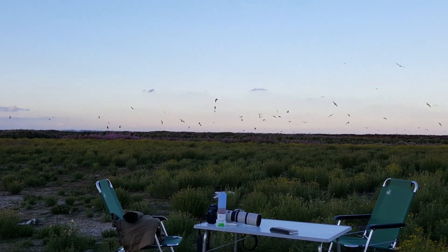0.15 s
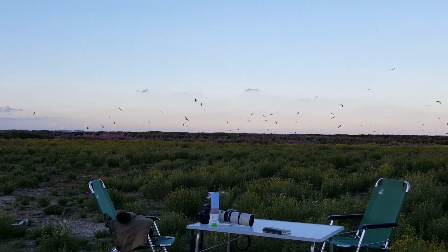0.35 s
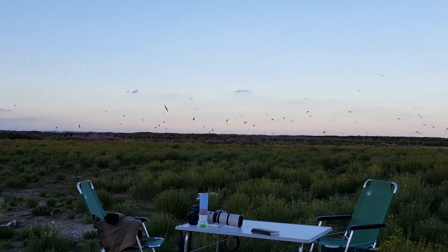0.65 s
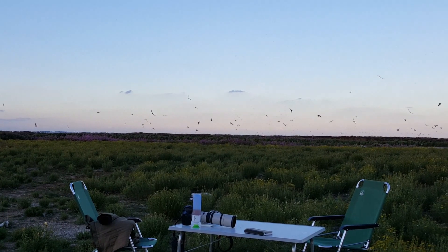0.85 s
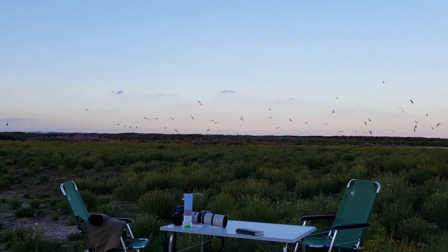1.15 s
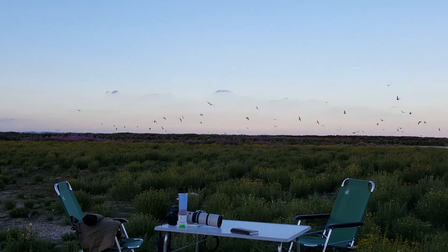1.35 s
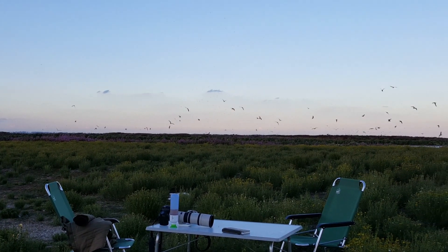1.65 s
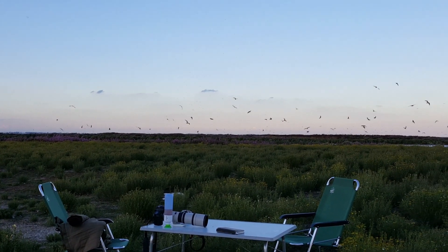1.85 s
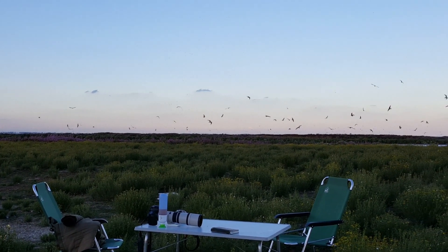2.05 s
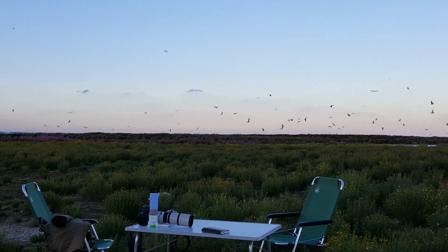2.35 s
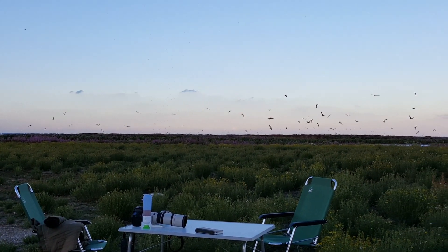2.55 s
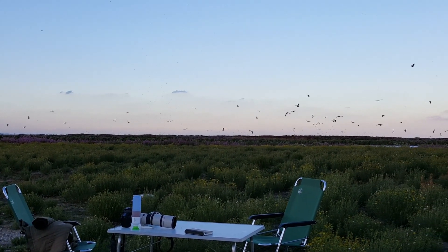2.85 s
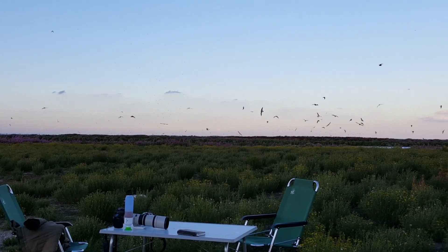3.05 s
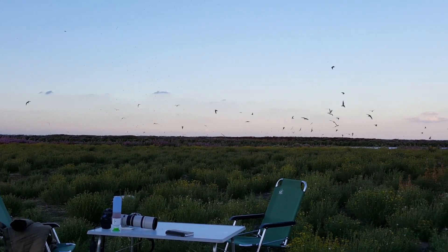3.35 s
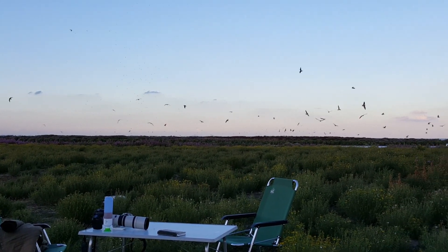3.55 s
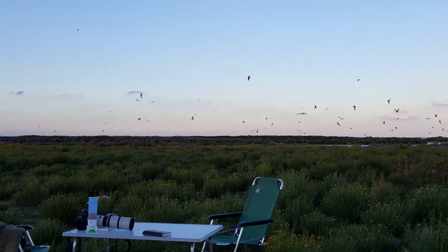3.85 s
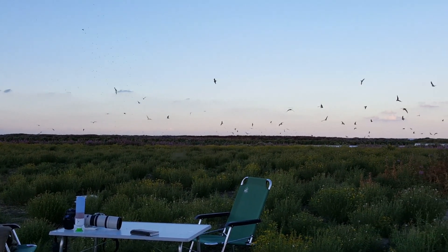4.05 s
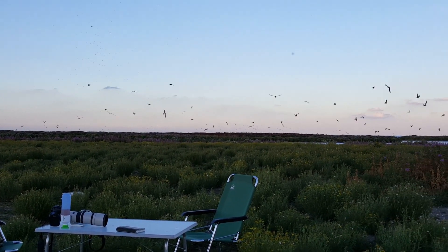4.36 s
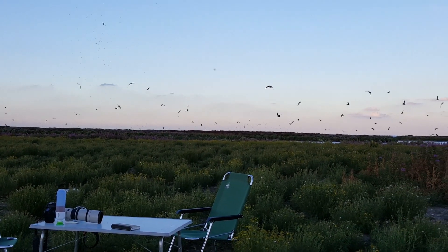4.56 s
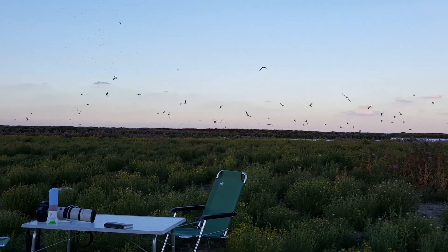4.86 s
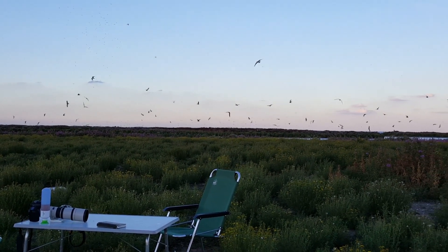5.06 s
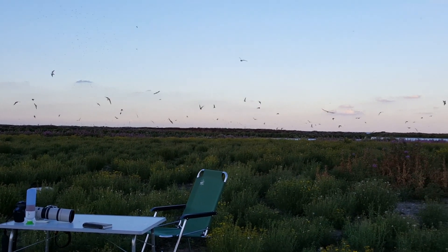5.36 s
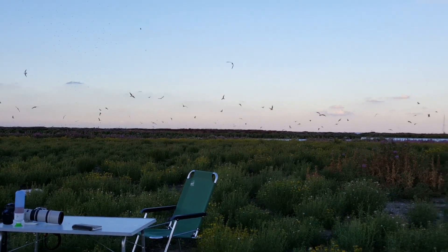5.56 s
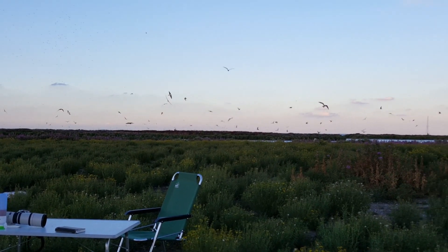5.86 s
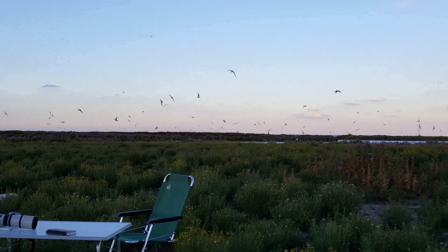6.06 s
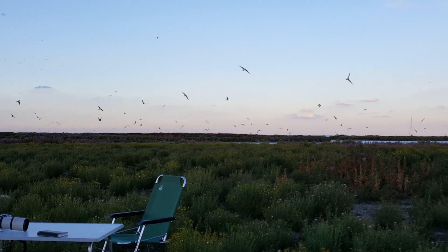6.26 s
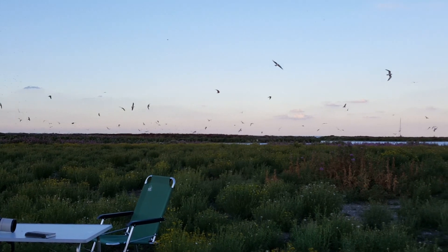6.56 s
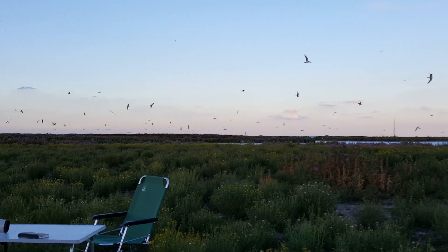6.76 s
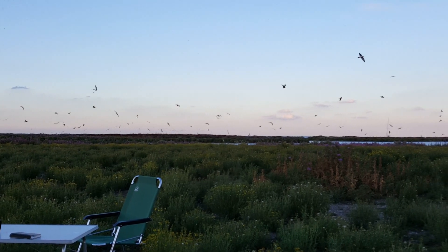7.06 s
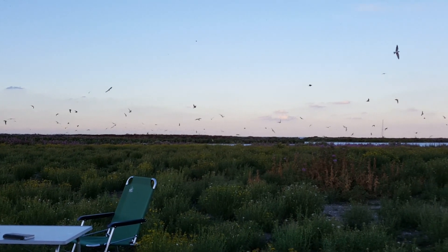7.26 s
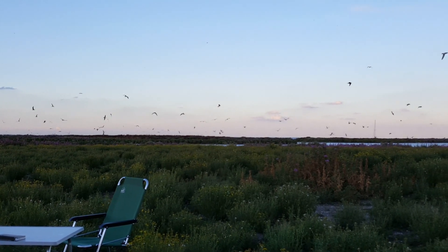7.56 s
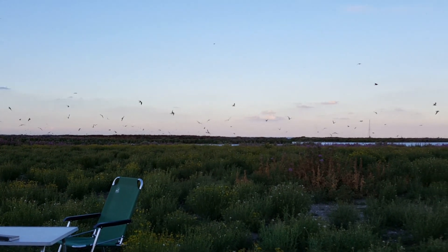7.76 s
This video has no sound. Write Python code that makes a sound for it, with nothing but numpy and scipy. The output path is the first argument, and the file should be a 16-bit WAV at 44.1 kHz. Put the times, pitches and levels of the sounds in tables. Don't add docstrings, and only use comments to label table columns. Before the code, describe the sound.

Hoarse, trilled seabird cries and dry rasps over a blurred distant chorus, with low wind buffeting, small bird chips and a brief insect buzz.

```python
import sys
import numpy as np
from scipy import signal
from scipy.fft import rfft, irfft, next_fast_len
from scipy.io import wavfile
from scipy.ndimage import uniform_filter1d

SR = 44100
rng = np.random.default_rng(int(sys.argv[2]) if len(sys.argv) > 2 else 0)


def volts(x):
    e = np.asarray(x, float) / 20
    return 10 ** e


def wrap_up_sound(samples):
    columns = np.atleast_2d(samples).T
    tamed = np.clip(columns, -1, 1)
    steps = np.round(tamed * 32767).astype(np.int16)
    wavfile.write(sys.argv[1], SR, steps)


N = 348390
PAD = 32


def near_calls(out):
    # t/s, pitch f/Hz, 2nd harmonic level/dB
    contours = [
        [(0.8, 1599, -40), (0.85, 1687, -40), (0.95, 1634, -44), (1.02, 1626, -40), (1.065, 1520, -39.5)],
        [(1.025, 1900, -41), (1.09, 1757, -49), (1.3, 1745, -48), (1.4, 1697, -45.5), (1.47, 1500, -44.5)],
        [(1.49, 1612, -44), (1.53, 1700, -45), (1.59, 1732, -47), (1.69, 1630, -45.5), (1.73, 1473, -44.5),
         (1.81, 1443, -50.5)],
        [(2.465, 1593, -33.5), (2.55, 1552, -40.5), (2.65, 1569, -41), (2.75, 1521, -37.5), (2.85, 1567, -42.5),
         (2.93, 1490, -49)],
        [(4.285, 1600, -41.5), (4.33, 1588, -42.5), (4.5, 1549, -39), (4.6, 1538, -42), (4.7, 1505, -38)],
        [(4.6, 1272, -68), (4.79, 971, -49.5)],
    ]
    # left lag/samples, left minus right/dB, harmonics 1, 3, 4 against the 2nd/dB
    birds = [(-10.5, -1.5, -7.5, -11, -22.5), (6, -3.5, -9, -19, -37), (15, -3.5, -8.5, -7.5, -18),
             (-7, 4, -21, -14, -23.5), (-1.5, 6, -15, -15, -20), (-4, 1, -3.5, 0, 1)]
    roughness = [.9, 1.3, 1.1, .7, .3, 1.5]
    for contour, bird, rough in zip(contours, birds, roughness):
        start_s = contour[0][0]
        hz, db = curves(contour)[1]
        sing(out, start_s, hz, db, *bird, rough)


def cries(out):
    # t/s, length/s, first f/Hz, end f/Hz, level/dB
    events = [(0.0, .15, 1623, 1501, -47), (.08, .06, 1130, 1100, -55), (.191, .17, 1650, 1600, -53),
              (.61, .13, 1750, 1780, -63), (.86, .22, 1560, 1520, -58), (1.07, .05, 1185, 1140, -51),
              (1.18, .13, 1560, 1480, -52), (2.111, .2, 1600, 1430, -52), (2.488, .19, 1687, 1615, -53.5),
              (3.335, .09, 1400, 1370, -54), (3.97, .2, 1800, 1700, -58), (4.044, .12, 1500, 1463, -50),
              (4.289, .35, 1670, 1584, -60), (5.23, .15, 1510, 1475, -60), (6.25, .17, 1360, 1330, -58),
              (6.95, .12, 1380, 1340, -56), (7.075, .22, 1900, 1750, -69), (7.141, .1, 1550, 1456, -63)]
    # left lag/samples, left minus right/dB, 3rd harmonic against the 2nd/dB
    birds = [(13.5, 0, -5.5), (17, -4, -17), (-12, 1.5, -6), (13.5, -0.5, 2), (5.5, -8, -3), (5.5, -5, -13),
             (3, -6, -4), (14.5, 0, -10), (-10.5, 1, 3), (14, -1, -17), (15.5, 3, -11), (14.5, -1, -6),
             (-9, -3, 5.5), (-8.5, -3, 2), (11.5, 3, -12), (11.5, 0, -12), (17, -11, 5), (9, -5.5, 7)]
    for (s, length, top_hz, end_hz, db), (lag, pan_db, third_db) in zip(events, birds):
        hz = np.linspace(top_hz, end_hz, int(length * SR))
        sing(out, s, hz, db, lag, pan_db, -6, third_db, -14 + .6 * third_db, rough=.9)


def arches(out):
    # t/s, length/s, top f/Hz, end f/Hz, level/dB
    events = [(0.129, 0.06, 1780, 1470, -54.5), (0.601, 0.074, 1678, 1743, -47.5),
              (1.287, 0.078, 1770, 1390, -48.5), (3.293, 0.037, 1687, 1670, -44),
              (3.485, 0.028, 1535, 1430, -65.5), (3.564, 0.21, 1554, 1467, -54),
              (4.13, 0.023, 1660, 1640, -58), (5.535, 0.28, 1657, 1604, -61.5),
              (5.878, 0.042, 1920, 1580, -57), (6.327, 0.14, 1723, 1695, -56),
              (6.698, 0.18, 1674, 1600, -59), (6.888, 0.083, 1580, 1310, -56.5),
              (7.59, 0.033, 1520, 1420, -68), (7.249, 0.063, 1740, 1580, -53.5),
              (7.465, 0.037, 1627, 1550, -63), (7.793, 0.035, 1900, 1650, -58),
              (7.791, 0.034, 1540, 1520, -58), (7.879, 0.028, 1480, 1480, -58.5),
              (3.367, 0.05, 1672, 1560, -70), (4.244, 0.046, 1590, 1460, -55),
              (5.944, 0.076, 1570, 1500, -52), (3.853, 0.035, 1554, 1320, -47.5),
              (0.769, .03, 1583, 1500, -51), (1.212, 0.047, 1640, 1500, -55),
              (1.781, 0.043, 1610, 1500, -53), (2.005, 0.033, 1620, 1450, -60),
              (2.958, 0.034, 1740, 1500, -51), (3.892, 0.034, 1630, 1480, -60),
              (4.195, 0.033, 1680, 1550, -79), (5.408, 0.045, 1560, 1330, -56),
              (7.418, .032, 1530, 1380, -66), (7.755, 0.04, 1500, 1290, -58),
              (6.54, 0.041, 1510, 1480, -63), (7.693, 0.037, 1730, 1680, -53),
              (5.328, 0.037, 1600, 1310, -60), (5.99, 0.027, 1900, 1650, -67),
              (6.134, 0.053, 1530, 1280, -63), (7.299, 0.038, 1680, 1620, -59.5)]
    # left lag/samples, left minus right/dB, 3rd harmonic against the 2nd/dB
    birds = [(15, -4, 0), (16.5, 1, -8.5), (6.5, -7, -4), (-8, -1, -12), (-9, -20, 7), (-12.5, -2, -2),
             (-13, -25, -9), (-17, -0.5, 4.5), (-9, -3, -5.5), (6, 4, -4.5), (-7, -0.5, 6), (-7.5, 1, 5.5),
             (15, -7, 3), (-16.5, -2, -5), (11, -12, 5.5), (-17, -13, -3.5), (-9, -5, 2), (7, 3, 11),
             (7, -4, 4), (-9, -17, -11), (10.5, 1, -8), (-11, -4, -7), (6.5, -5, 2), (11, -6, -4),
             (11, 3, -1), (11, 3, 0), (15, 0, -8), (23, 3, -17), (14, 0, -2), (14, -2, -10), (13, 1, 5),
             (11, -2, 0), (6, -4, 5.5), (16.5, 0, -9), (-6.5, -2, 6), (-9, -5, 1), (11, 2, 4),
             (11, -2, 4.5)]
    top_at = 0.378
    for (s, length, top_hz, end_hz, db), (lag, pan_db, third_db) in zip(events, birds):
        along = np.linspace(0, 1, int(length * SR))
        bend = np.interp(along, [0, top_at, 1], [1, 0, 1]) ** 2
        foot_hz = np.where(along < top_at, top_hz * (1 - .09), end_hz)
        hz = top_hz + (foot_hz - top_hz) * bend
        db = db - 2.5 * bend
        sing(out, s, hz, db, lag, pan_db, -6, third_db, -14 + .6 * third_db, rough=.35 + 2 * length)


def sing(out, s, hz, db, lag, pan_db, first_db, third_db, fourth_db, rough):
    # t/s, trill rate f/Hz, first pulse after/s, depth 0-1, harmonics 5-8
    # level/dB
    trill_rows = [(.8, 58.8, 0.0031, 0.2, -42.5), (1.025, 55, 0.0075, 0.8, -41),
                  (1.49, 57.4, 0.01, 0.45, -38), (2.465, 57.7, 0.0141, 0.6, -36),
                  (2.485, 58.2, 0.0026, 0.6, -23), (4.285, 57.5, 0.0054, 1, -36),
                  (4.29, 57.8, 0.011, 1, -27), (5.23, 57, 0.016, 0.6, -34), (2.11, 33, 0.015, 0.6, -36),
                  (4.045, 38, 0.013, 1, -44), (5.534, 55, 0.0041, 0.74, -42), (7.075, 41, 0.0037, 0.6, -39),
                  (3.562, 45, 0.004, 0.56, -34), (.86, 43, 0.0146, 1, -44)]
    trills = {row[0]: row[1:] for row in trill_rows}
    nearest = min(trills, key=lambda at: abs(at - s))
    gentle = (56, 0, .3, -42)
    *shape, top_db = trills[nearest] if abs(nearest - s) < .0045 else gentle
    rate, first_s, depth = shape
    tiring = np.linspace(2, -5, len(hz))
    uppers = [top + tiring for top in (top_db, top_db, top_db - 1, top_db + 2)]
    stack = [first_db, 0, third_db, fourth_db] + uppers
    cycle = (rate * (np.arange(len(hz)) / SR - first_s) + .5) % 1 - .5
    hz = hz * (1 - 2 * .012 * min(depth, 1) * cycle)
    tone = voice(hz, stack, wobble=.0065 * rough, flutter_db=1.8, hoarse=.45 * rough)
    breath = level(ring(rng.standard_normal(len(hz)), 5400, 5400), top_db + 12.5)
    sound = (tone + breath) * volts(db) * fade(len(hz), .008)
    add(out, sound * trill(len(hz), *shape), int(s * SR), lag, pan_db)


def voice(hz, harmonics_db, wobble, flutter_db, hoarse):
    size = len(hz)
    unsteady = wobble * (walk(120.9, size) + walk(700, size))
    phase = 2 * np.pi * np.cumsum(hz * (1 + unsteady)) / SR
    stack = 0
    for number, db in enumerate(harmonics_db, 1):
        stack = stack + volts(db + flutter_db * walk(61.4, size)) * np.sin(number * phase)
    return np.sqrt(2) * stack * (1 + hoarse * walk(1500, size))


def trill(size, rate, first_s, depth):
    phase = 2 * np.pi * rate * (np.arange(size) / SR - first_s)
    depth = np.clip(depth, 0, 1)
    shut = .5 - .5 * np.tanh(5.5 * (np.cos(phase) + 0.22))
    return level(1 - depth * shut)


def rasps(out):
    # t/s, level/dB
    swells = [
        [(1.46, -40.5), (1.61, -40.5), (1.62, -34)],
        [(2.93, -41.5), (3.1, -37), (3.28, -34.5), (3.335, -44)],
        [(4.7, -42.5), (4.86, -41.5), (5.06, -40), (5.1, -44.5), (5.262, -46), (5.285, -58)],
    ]
    rattles = [(242, 66, 0.03, 8.5, -1.5, -29), (223, 50, 0.3, -6.5, 2.5, -18),
               (222.6, 56, 0.98, -2, 4.5, -24)]
    starts = [(0.0037, 3040), (.006, 3120), (.002, 3126)]
    for swell, (rate, trill_rate, depth, lag, pan_db, treble_db), first in zip(swells, rattles, starts):
        start, (db,) = curves(swell)
        sound = rattle(len(db), rate, trill_rate, depth, treble_db, *first)
        add(out, sound * volts(db) * fade(len(db), 0.0057), start, lag, pan_db)


def far_rasps(out):
    # t/s, length/s, throat f/Hz, trill rate f/Hz, level/dB
    events = [
        (0.857, 0.16, 2730, 58.3, -62),
        (1.7, 0.13, 2500, 56.7, -49),
        (1.93, 0.15, 2580, 56.1, -54),
        (2.297, 0.13, 2730, 55.1, -50),
        (3.501, 0.36, 2560, 55.9, -51.5),
        (5.438, 0.38, 2550, 55.7, -65),
        (5.9, 0.24, 2620, 55.3, -62),
        (6.922, 0.23, 2720, 56.3, -56),
        (7.499, 0.22, 2700, 45.5, -56),
        (7.809, 0.1, 2560, 46.2, -60),
    ]
    lags = [8, 10, -8, 12, 13, 12, 7, 8, 15, 15]
    for (s, length, hz, trill_rate, db), lag in zip(events, lags):
        size = int(length * SR)
        sound = rattle(size, 4.4 * trill_rate, trill_rate, .8, -29, 0, hz)
        add(out, sound * volts(db + 2 * walk(17, size)) * fade(size, 0.014), int(s * SR), lag, -1.5)


def rattle(size, rate, trill_rate, depth, treble_db, first_s, throat_hz):
    # f/Hz, width f/Hz, level/dB
    throat = [
        (3060, 750, 11.5),
        (1500, 1070, -9.5),
        (5120, 650, -13.5),
        (930, 1070, -8.5),
    ]
    chance = rng.standard_normal((int(size / SR * trill_rate) + 1, 9))
    groups = first_s + np.arange(len(chance)) / trill_rate + .0003 * chance[:, 8]
    along = np.linspace(0, 1, len(chance))
    groups = groups + .003 * depth * along ** 3
    gap = (1 + depth * (.45 * along ** 2 - .17))[:, None] / rate
    click_s = groups[:, None] + (np.arange(4) + .11 * chance[:, :4]) * gap
    at = (click_s * SR).astype(int).clip(0, size)
    gains = volts(1.8 * chance[:, 4:8] - 0.54 * np.arange(4))
    gains[:, 2] *= np.clip(1 - depth * 4 * (along - .62), 0, 1)
    gains[:, 3] *= np.clip(1 - depth * np.linspace(.6, 1.5, len(chance)), 0, 1)
    clicks = np.zeros(size + 1)
    clicks[at] = gains
    clicks = clicks[:size]
    shift = throat_hz / throat[0][0]
    body = 0
    for hz, width, db in throat:
        body = body + volts(db) * level(ring(ring(clicks, hz * shift, width), hz * shift, width))
    treble = level(ring(ring(clicks, 6500, 3200), 7500, 8300))
    return level(body + volts(treble_db) * treble)


def chips(out):
    # t/s, peak level/dB, 3rd harmonic f/Hz, left minus right/dB
    events = [
        (0.377, -43, 4260, -17),
        (0.4067, -37, 3970, -10),
        (0.65, -55, 5100, -10),
        (2.2776, -41, 4220, 1),
        (3.698, -41, 4640, -2),
        (4.06, -41, 4640, -1),
        (5.6226, -47.5, 5440, 1),
        (6.33, -48, 4750, 8),
        (6.8942, -57, 4540, 2),
    ]
    t = np.arange(1500) / SR
    hook = 1 - 600 * (t - .009) ** 2
    envelope = np.exp(-t / 0.0084) * fade(len(t), 0.0035)
    for s, db, hz, pan_db in events:
        phase = 2 * np.pi * np.cumsum(hz * hook) / SR
        tone = 0
        for k, part_db in enumerate([-5, -1.5, -9, -17.5], 2):
            tone = tone + volts(part_db) * np.sin(phase * k / 3)
        add(out, volts(db) * tone * envelope, int(s * SR), -8, pan_db)


def insect(out):
    # t/s, level/dB
    swells = [
        [(0.215, -69), (0.231, -47), (0.285, -58)],
        [(7.659, -74), (7.669, -58), (7.725, -62)],
    ]
    band = signal.butter(4, [6300, 8300], "band", fs=SR, output="sos")
    for swell in swells:
        start, (db,) = curves(swell)
        buzz = signal.sosfilt(band, rng.standard_normal(len(db)))
        buzz = buzz + 3.5 * ring(buzz, 5900, 900)
        add(out, level(buzz * trill(len(db), 47, 0.011, 0.84)) * volts(db), start, -4, -1.5)


def chorus(count, size):
    # t/s, level/dB, brightness/dB
    swell = [(0, -50, 13), (.7, -51.5, 7), (1, -51.5, 13), (1.8, -48, 6), (2.3, -52.5, 6.5),
             (2.8, -43.5, 5), (3.4, -50, 5), (4.05, -49.5, -2.5), (4.6, -41, 7), (4.9, -45, -3),
             (5.4, -53.5, 4), (6.0, -55, 6), (6.9, -55.5, 7.5), (7.6, -52.5, 4.5), (7.9, -49, 0)]
    out = np.zeros((2, N + 2 * SR))
    for length, pitch, tilt, depth, harsh, *calls in rng.random((count, 5 + 3 * size)):
        arch = np.linspace(-.7, 1, int(SR * (.035 + .09 * length ** 4)))
        hz = (1200 + 520 * pitch) * (1 - 0.086 * arch ** 2)
        stack = [-9, 0, -12 + 8 * tilt, -21 + 9 * tilt]
        sound = voice(hz, stack, wobble=.009, flutter_db=3.5, hoarse=.45)
        sound = sound * trill(len(hz), 52 + 9 * tilt, 0, depth)
        if harsh < .5:
            rasp = rattle(2 * len(hz), 200 + 80 * harsh, 54, depth, -40, 0, 2300 + 900 * pitch)
            sound = np.r_[sound, volts(-1.5) * rasp]
        sound = sound * fade(len(sound), 0.0018)
        for when, loud, side in np.reshape(calls, (size, 3)):
            add(out, sound * volts(-6 * loud), int(when * (N + SR / 2)), 36 * side - 20, -3 + 5 * side)
    out = level(out[:, SR // 2:SR // 2 + N])
    birds = out + volts(-5.0) * scatter(out, 0.03)
    db, bright_db = curves(swell)[1]
    treble = signal.sosfilt(signal.butter(2, 4000, "high", fs=SR, output="sos"), birds)
    birds = birds + (volts(bright_db) - 1) * treble
    haze_db = np.mean(db) + 0.5 * (db - np.mean(db))
    return volts(db) * birds + volts(haze_db) * haze()


def haze():
    # f/Hz, density level/dB
    spectrum = [(290, -8.5), (500, -9), (901, -13.5), (1150, -5.5), (1250, -23), (1510, -3.5), (1990, -3),
                (2930, -2), (3680, -4.5), (4840, -6), (5350, -11), (6090, -19), (8600, -30), (15500, -27.5)]
    return level(colour(rng.standard_normal((2, N)), spectrum), -3.14)


def wind():
    # f/Hz, density level/dB
    rumble_spectrum = [(12, -59), (20, -21), (54, -1), (114, 2), (240, -12), (281, -44), (461, -32),
                       (900, -32.5), (1170, -27.5), (1980, -120)]
    # f/Hz, density level/dB
    buffet_spectrum = [(12, -45), (20, -46), (54, -9), (233, 1.5), (380, -8.5), (576, -19), (841, -34),
                       (1050, -45), (1500, -28), (1950, -72), (3300, -120)]
    low, high = gusts()
    shared = walk(20, N)
    ports = []
    for thump in thumps():
        eddy_db = 5.9 * shared + 4.9 * walk(30, N) + 3.84 * walk(90, N)
        rumble = level(colour(rng.standard_normal(N) * volts(0.85 * eddy_db), rumble_spectrum))
        buffet = level(colour(rng.standard_normal(N) * volts(eddy_db), buffet_spectrum))
        rumble, buffet = (x / np.sqrt(uniform_filter1d(x ** 2, 6000)) for x in (rumble, buffet))
        ports.append(low * rumble + high * buffet + thump)
    return np.array(ports)


def gusts():
    # t/s, length/s, rumble level/dB, buffeting level/dB
    events = [(0.0, 0.064, -37, -60), (0.191, 0.22, -40, -47), (0.43, 0.24, -44, -43),
              (0.657, 0.39, -47, -71), (1.285, 0.32, -49.5, -67), (1.89, 0.47, -54, -71),
              (2.34, 0.24, -40.5, -58), (2.475, 0.24, -35.5, -34), (2.805, 0.12, -35.5, -43.5),
              (2.971, 0.12, -40.5, -47.5), (3.154, 0.18, -38, -47.5), (3.419, 0.11, -42, -71),
              (4.864, 0.22, -38.5, -73), (5.023, 0.26, -41.5, -37.5), (5.41, 0.82, -43, -46.5),
              (6.21, 0.44, -42.5, -35), (6.678, 0.36, -42, -37), (6.972, 0.4, -42, -47),
              (7.58, 0.37, -55, -77)]
    calm_db, edge_s = np.array([[-57.5], [-73]]), 0.12
    t = np.arange(N) / SR
    power = volts(calm_db) ** 2
    for s, length, *db in events:
        swell = np.clip(np.minimum(t - s, s + length - t) / edge_s + .5, 0, 1) ** 2
        power = power + swell * volts(np.array(db)[:, None]) ** 2
    return np.sqrt(power)


def thumps():
    # t/s, peak level/dB, f/Hz, left minus right/dB, #
    # swell/s
    puffs = [(0.108, -40, 119, 5, 0.02), (0.203, -39, 133, 13, 0.013), (0.242, -32, 167, 13, 0.015),
             (0.305, -24, 171.5, 5.5, 0.014), (0.44, -38, 110, 12, 0.011), (0.486, -37, 228, 13, 0.01),
             (0.586, -40.5, 192.5, 23.5, 0.017), (0.848, -35.5, 118, 8, 0.0082),
             (2.424, -36, 129, 13, 0.0094), (2.501, -17.5, 202, 1.5, 0.015), (2.564, -27, 132.5, 4, 0.0091),
             (2.588, -14.5, 238, -1, 0.0069), (2.645, -33, 147, -5, 0.0053), (2.811, -45, 114, -2.0, 0.01),
             (2.905, -32, 190.6, 15, 0.013), (3.147, -28.5, 120, -3, 0.0072), (3.243, -21, 109, -1, 0.0062),
             (3.257, -23, 183.5, 6.5, 0.0074), (3.303, -31.5, 132, -1, 0.012),
             (5.014, -41, 112.7, -1, 0.012), (5.069, -25, 109.5, 0, 0.017), (5.229, -38, 189, 7, 0.0076),
             (5.461, -35, 148.5, 15, 0.012), (5.57, -38.5, 130, 18, 0.017), (5.677, -28.5, 110, 3, 0.015),
             (5.727, -32, 159, 8, 0.0084), (5.909, -29, 190.6, 0, 0.0108), (6.072, -29, 184, 3, 0.014),
             (6.11, -26.5, 200, 3.5, 0.011), (6.266, -15.5, 180.4, 2.0, 0.011),
             (6.318, -22.5, 205.6, -0.5, 0.012), (6.364, -28.5, 229, -6, 0.012),
             (6.424, -24, 193, 2, 0.012), (6.581, -25.5, 163.6, -4.0, 0.013), (6.644, -30.5, 255, 5, 0.011),
             (6.701, -36, 251, 9, 0.01), (6.767, -25.5, 242.4, 4.5, 0.016), (6.93, -34, 172, -1, 0.0065),
             (7.022, -25.5, 109.8, 1, 0.01), (7.154, -26, 232, 9, 0.01),
             (5.763, -32.5, 187.4, -4, 0.015),
        (6.812, -25.5, 277, -6, 0.012),
        (6.854, -25, 254, 7.5, 0.0069),
        (6.998, -31.5, 200, 12, 0.014),
        (7.261, -35, 316, 0, 0.0092),
        (7.312, -37.5, 188, -5, 0.0075),
    ]
    out = np.zeros((2, N + SR))
    t = np.arange(4000) / SR
    for s, peak_db, hz, pan_db, swell_s in puffs:
        start = int(s * SR)
        swell = (t / swell_s * np.exp(1 - t / swell_s)) ** 1.37
        swing = np.zeros((2, PAD + len(t)))
        add(swing, volts(peak_db - 2.0) * swell, 0, 0, pan_db)
        for port, (shape, offset) in enumerate(zip(swing[:, PAD:], rng.random(2))):
            pace = hz * (1 + 1.4 * t + 0.17 * walk(149.2, len(t)))
            phase = 2 * np.pi * (offset + np.cumsum(pace) / SR)
            out[port, start:start + len(t)] += shape * (np.sin(phase) + 0.22 * np.sin(2 * phase + 1))
    return out[:, :N]


def flutter():
    # t/s, length/s, flap rate f/Hz, level/dB, left minus right/dB
    trains = [
        (2.22, 0.098, 81, -58.5, 4),
        (2.681, 0.34, 67, -58.5, 5),
    ]
    # t/s, peak level/dB
    flaps = [
        (.447, -47),
        (.475, -42),
        (.494, -38),
        (.510, -40),
        (.525, -51),
        (.544, -42),
        (.606, -56),
        (.624, -45),
        (.638, -47),
        (.656, -48),
    ]
    out = np.zeros((2, N + SR))
    for s, length, rate, db, pan_db in trains:
        timing, force = rng.standard_normal((40, 2)).T
        at = (np.cumsum(1 + .06 * timing) * SR / rate).astype(int) - int(SR / rate) + 50
        clicks = np.zeros(int(length * SR))
        inside = at < len(clicks)
        clicks[at[inside]] = volts(3.0 * force[inside])
        add(out, level(ring(ring(clicks, 680, 470), 480, 600), db), int(s * SR), 0, pan_db)
    flap = ring(ring(signal.unit_impulse(800), 460, 340), 450, 400)
    for s, db in flaps:
        add(out, volts(db) * flap / flap.max(), int(s * SR), 0, 12)
    return out[:, PAD:PAD + N]


def scatter(x, decay_s):
    t = np.arange(SR // 4) / SR
    tail = rng.standard_normal((2, len(t))) * np.exp(-t / decay_s)
    tail = tail / np.sqrt(np.mean(np.sum(tail ** 2, 1)))
    return signal.fftconvolve(x, tail, axes=1)[:, :N]


def through_ports(air):
    # f/Hz, left minus right/dB
    difference = [(200, -0.5), (1200, -0.5), (2400, -0.5), (5000, -7), (7000, -7.5), (10000, 9),
                  (15000, -2.5)]
    left = colour(air[0], [(hz, db / 2) for hz, db in difference])
    right = colour(air[1], [(hz, -db / 2) for hz, db in difference])
    return np.array([left, right])


def level(x, db=0):
    return x * volts(db) / np.sqrt(np.mean(x ** 2))


def colour(x, points):
    hz, db = np.transpose(points)
    size = next_fast_len(x.shape[-1])
    f = np.maximum(np.arange(size // 2 + 1) * SR / size, 1)
    gain = volts(np.interp(np.log(f), np.log(hz), db))
    return irfft(rfft(x, size) * gain, size)[..., :x.shape[-1]]


def ring(x, hz, width):
    return signal.lfilter(*signal.iirpeak(hz, hz / width, SR), x)


def walk(rate, size):
    k = int(SR / rate)
    steps = np.repeat(rng.standard_normal(size // k + 1), k)
    return 1.31 * uniform_filter1d(uniform_filter1d(steps, k), k)[:size]


def curves(table):
    s, *columns = np.transpose(table)
    start = int(s[0] * SR)
    t = np.arange(start, min(int(s[-1] * SR), N)) / SR
    return start, [np.interp(t, s, c) for c in columns]


def add(out, x, start, lag, pan_db):
    for channel, side in enumerate((1, -1)):
        first = PAD + start + int(round(side * lag / 2))
        out[channel, first:first + len(x)] += x * volts(side * pan_db / 2)


def fade(size, rise_s):
    edge = np.minimum(np.arange(size), np.arange(size)[::-1])
    return np.minimum(edge / (rise_s * SR), 1)


def scene():
    near = np.zeros((2, N + SR))
    for source in (near_calls, cries, arches, rasps, far_rasps, chips, insect):
        source(near)
    near = near[:, PAD:PAD + N]
    air = near + volts(-12) * scatter(near, .04) + chorus(count=130, size=6)
    return wind() + flutter() + through_ports(air)


def low_pass(x):
    return signal.sosfilt(signal.butter(12, 15710, fs=SR, output="sos"), x)


def record(dry):
    mix = colour(dry, [(15700, 0), (15730, -70)])
    return low_pass(mix)


dry = scene()
out = record(dry)
wrap_up_sound(out)
```